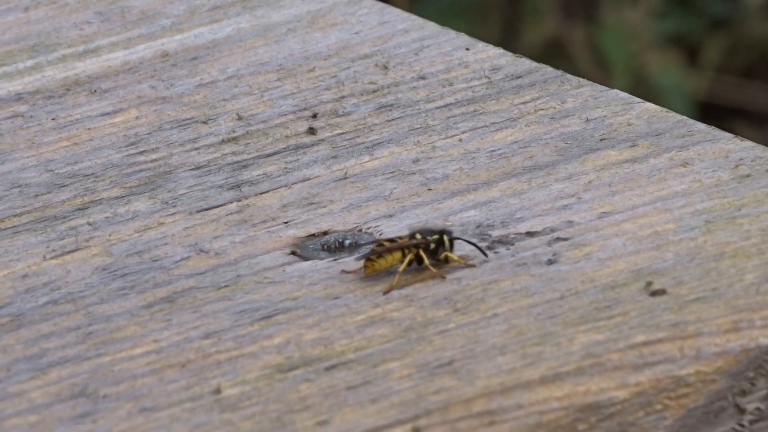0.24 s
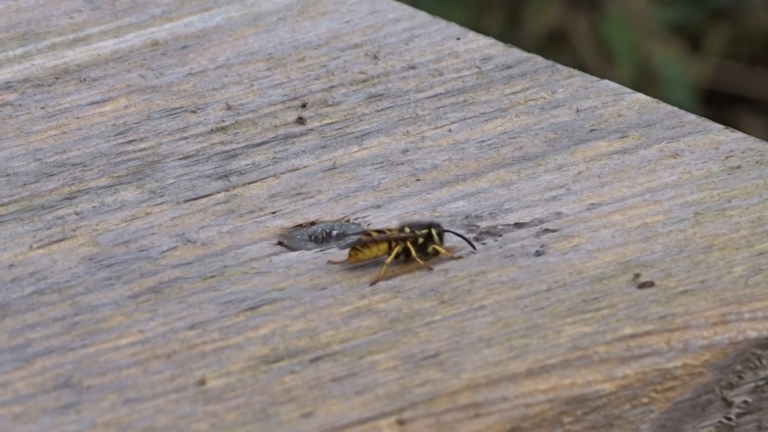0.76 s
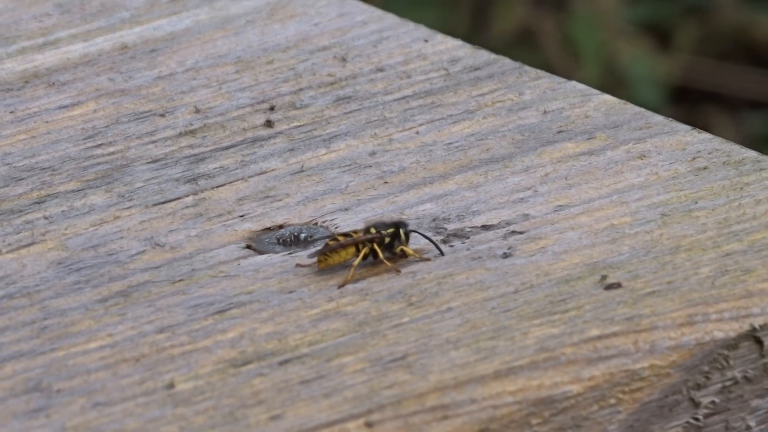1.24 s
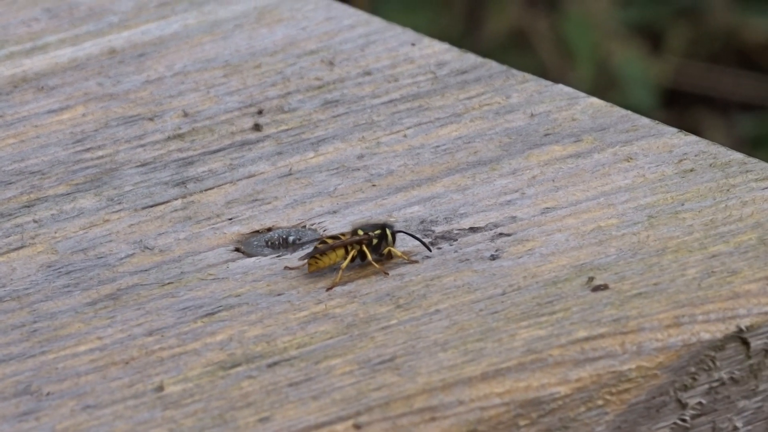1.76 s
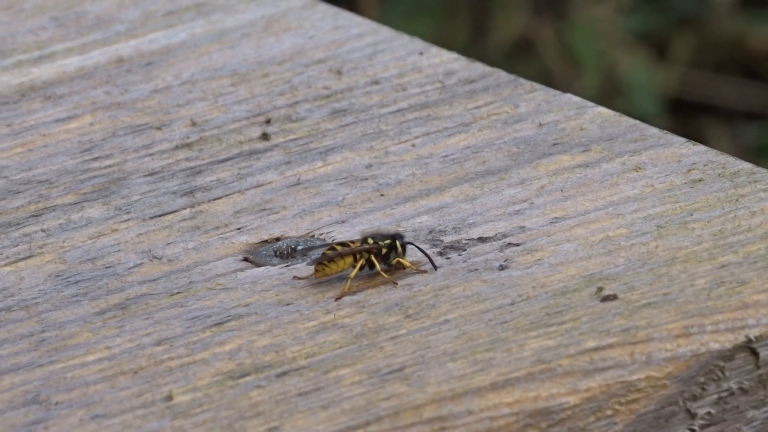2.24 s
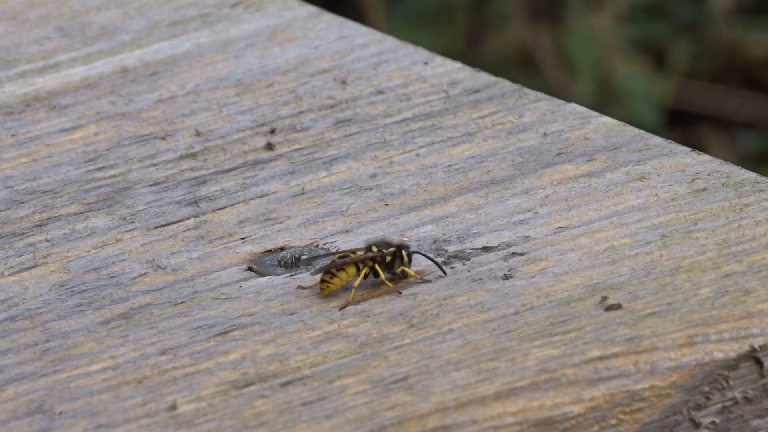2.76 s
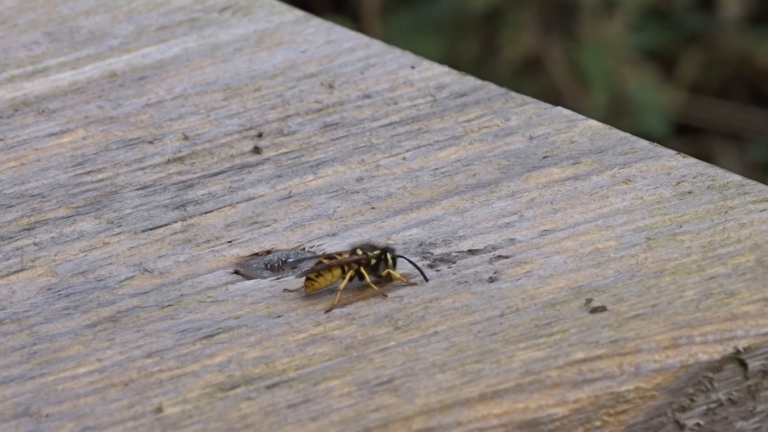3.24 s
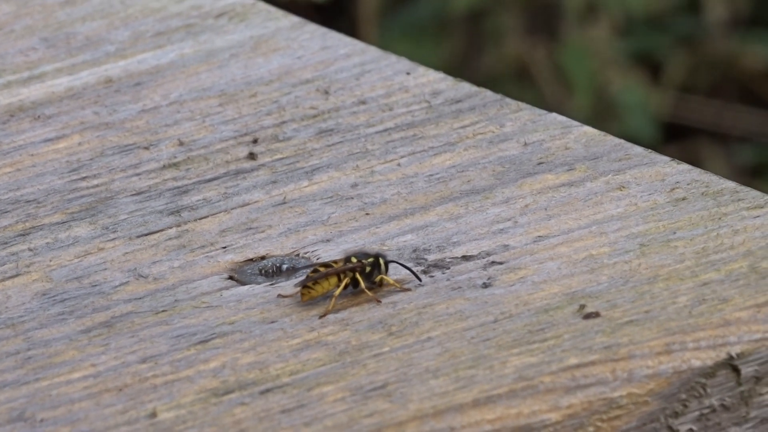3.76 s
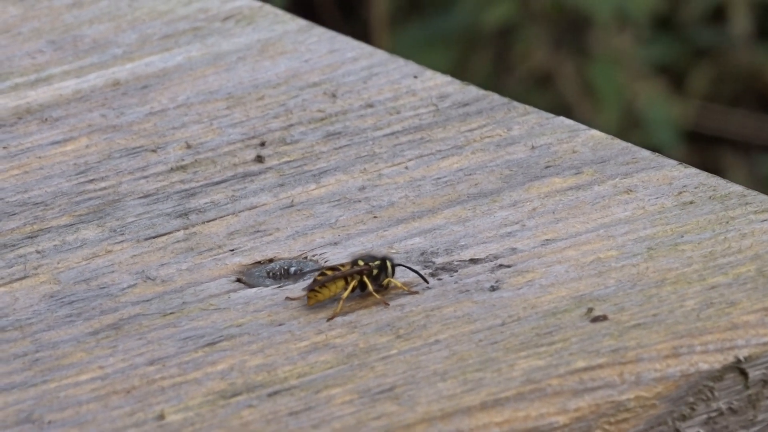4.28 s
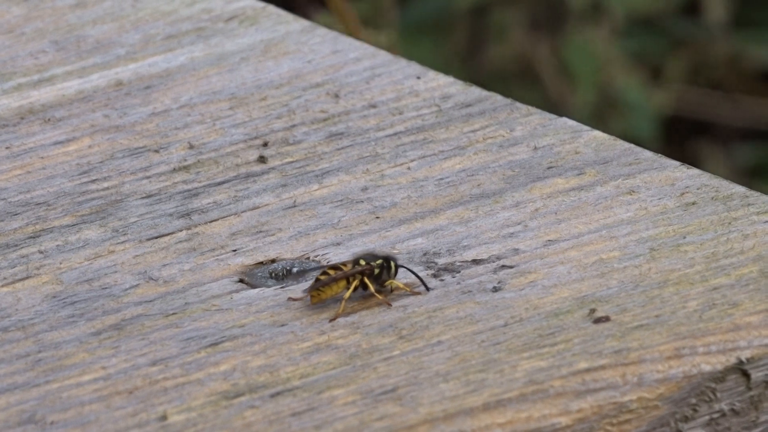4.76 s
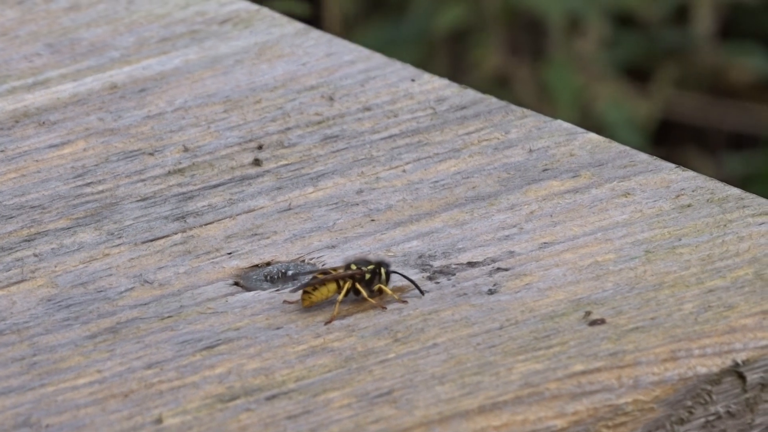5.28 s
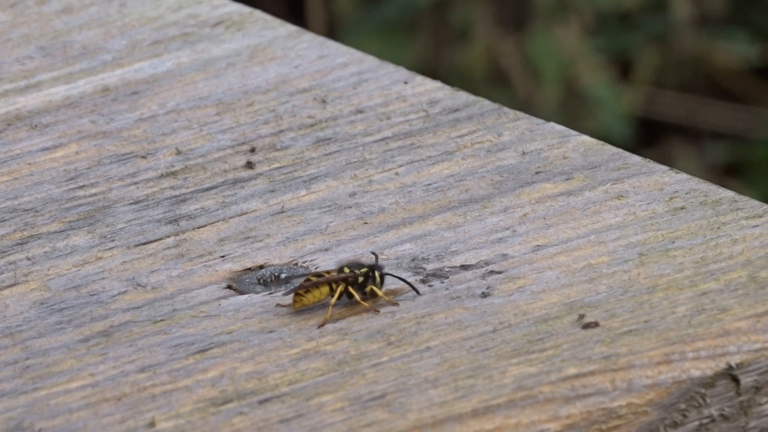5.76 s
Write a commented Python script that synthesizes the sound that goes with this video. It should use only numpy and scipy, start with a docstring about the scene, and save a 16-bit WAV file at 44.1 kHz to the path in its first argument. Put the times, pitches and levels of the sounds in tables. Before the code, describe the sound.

Quiet outdoor garden ambience: distant traffic wash and low engine drone, faint wasp rasping on wood, high cricket buzz, light wind thumps.

```python
"""A wasp rasps fibre off a weathered rail, close to a hand-held camera in a garden: dense tiny clicks.
Bush-crickets buzz very high in the undergrowth, as pulsed noise, and small birds tick far away, as short whistles.
A distant engine drones in a few sine harmonics and slowly speeds up under the filtered-noise wash of a road.
Shrubs stir softly, and light wind buffets the microphone with low flutter and brief pressure dips over faint hiss."""
import sys
import numpy as np
from scipy import signal
from scipy.fft import rfft, irfft, next_fast_len
from scipy.io import wavfile
from scipy.ndimage import uniform_filter1d

SR = 44100
rng = np.random.default_rng(int(sys.argv[2]) if len(sys.argv) > 2 else 0)


def digitize_waveform(pressure):
    """Quantize a signal to 16-bit integers and store it at the path in sys.argv[1].

    Rows of a 2-D input are taken as channels; values are limited to [-1, 1].
    """
    field = np.atleast_2d(pressure).T
    bounded = np.clip(field, -1, 1)
    quanta = np.round(bounded * 32767).astype(np.int16)
    wavfile.write(sys.argv[1], SR, quanta)


N = 265349
TIME = np.arange(N) / SR  # seconds

# Spectrum of tyres on the road. Each row: frequency in Hz, level in dB per Hz.
TYRE_ROAR = [(300, -28.5), (550, -26), (750, -2), (980, 0), (1250, -1), (1600, -11), (2400, -32),
             (4000, -41)]
# Direction of the road. Each row: frequency in Hz, phase by which the left port leads in radians.
ROAD_LEAD = [(0, 0), (300, 0.51), (620, 0.6), (1000, 0.44), (2000, 0), (3500, 0), (6000, 0)]


def undb(db):
    """Decibels to gain."""
    return 10 ** (np.asarray(db) / 20)


def unit(x):
    """Scale to rms 1."""
    return x / np.sqrt(np.mean(x ** 2))


def curves(table):
    """Each column of a time table, joined by straight lines."""
    s, *columns = np.transpose(table)
    return [np.interp(TIME, s, c) for c in columns]


def colour(x, spectrum):
    """Filter by (Hz, dB) points on a log-frequency axis."""
    hz, db = np.transpose(spectrum)
    size = next_fast_len(N)
    bins = np.maximum(np.arange(size // 2 + 1) * SR / size, 1)
    gain = undb(np.interp(np.log(bins), np.log(hz), db))
    return irfft(rfft(x, size) * gain, size)[..., :N]


def noise(spectrum):
    """Coloured noise of rms 1."""
    return unit(colour(rng.standard_normal(N), spectrum))


def walk(rate):
    """Random levels held 1 / rate s and slewed twice; spread near 1."""
    k = int(SR / rate)
    steps = np.repeat(rng.standard_normal(N // k + 1), k)
    return 1.345 * uniform_filter1d(uniform_filter1d(steps, k), k)[:N]


def pan(db):
    """Left and right gains for a left minus right level difference."""
    return undb(np.array([[db], [-db]]) / 2)


def spread(mid, side):
    """Left and right from mid and side."""
    return np.array([mid + side, mid - side])


def wash(spectrum, side_db, flicker_db, rate):
    """Diffuse stereo noise whose level flickers in the moving air."""
    pair = spread(noise(spectrum), undb(side_db) * noise(spectrum))
    return pair * undb(flicker_db * walk(rate))


def swells(events, rest_db=-120):
    """Gain of a resting level with bell-shaped swells (s, dB, half length s) on top; their powers add."""
    power = undb(rest_db) ** 2
    for s, db, half in events:
        power = power + undb(db) ** 2 * np.exp(-((TIME - s) / half) ** 2)
    return np.sqrt(power)


def lead(pair, table):
    """Sound from the left reaches the left port first: turn the phase by (Hz, radians) points."""
    hz, radians = np.transpose(table)
    size = next_fast_len(N)
    turn = np.interp(np.arange(size // 2 + 1) * SR / size, hz, radians)
    return irfft(rfft(pair, size) * np.exp(.5j * np.array([turn, -turn])), size)[:, :N]


def hiss():
    """Smooth, faint microphone hiss, its stereo width varying with frequency."""
    # Hiss spectrum. Each row: frequency in Hz, level in dB per Hz.
    hiss_spectrum = [(1500, -2), (3500, -1), (5200, -6.5), (6200, 0.5), (6700, -2), (7500, 3), (8300, 1.5),
                     (9400, -2), (12000, 0.5), (16000, -0.5)]
    # Width of the hiss. Each row: frequency in Hz, side against mid in dB.
    hiss_width = [(2000, 1), (4000, -5), (5300, -15), (7300, -33), (8600, -6), (9700, -1.5), (12000, -6),
                  (14000, -6), (16000, 4)]
    return undb(-54.5) * spread(noise(hiss_spectrum), colour(noise(hiss_spectrum), hiss_width))


def wind(sharpness=1.3, lag_s=0.0013):
    """A low flutter on the microphone; each stronger eddy is one brief dip in pressure."""
    # Flutter spectrum. Each row: frequency in Hz, level in dB per Hz.
    flutter_spectrum = [(6, -25), (15, 5), (30, -1), (80, 1.5), (130, -13.5), (220, -20), (500, -46.5)]
    # Gusts. Each row: time of the peak in seconds, level in dB, half length in seconds.
    gusts = [(.75, -46.5, 0.087), (4.0, -43, 0.54), (4.68, -39, 0.092), (5.19, -38, 0.077),
             (5.8, -39, 0.08)]
    # Eddies that hit the microphone. Each row: time in seconds, peak in dB, pitch in Hz,
    # left minus right in dB.
    buffets = [(0.473, -34, 79, 7), (0.808, -32, 60, 0), (3.944, -27, 65, 1), (4.537, -24, 108, -1),
               (4.643, -26, 40.3, -11), (4.65, -28, 185, 6.5), (4.714, -20, 76, -2), (4.771, -25.5, 86, 15),
               (4.789, -30.5, 120, 13), (5.107, -24, 70, 0), (5.1259, -17, 136, 3),
               (5.159, -23.5, 133.3, 2), (5.243, -24, 132, 5), (5.265, -25, 126, -2)]
    calm_db = -48.5  # between gusts
    out = swells(gusts, calm_db) * wash(flutter_spectrum, side_db=-15.5, flicker_db=2.0, rate=16)
    for s, db, hz, pan_db in buffets:
        near = np.abs(TIME - s) < .08
        t = TIME[near] - s - np.array([[lag_s], [-lag_s]]) / 2  # the eddy crosses the right port first
        # a smooth dip with a shoulder on each side
        dip = np.real((1 - 1j * sharpness * hz * t) ** -6)
        out[:, near] -= undb(db) * pan(pan_db) * dip
    return out


def cars():
    """Single cars swell and fade with the same tyre roar, shifted so that faster ones sound higher."""
    # Passing cars. Each row: time when nearest in seconds, roar in dB, half length in seconds,
    # centre of the roar in Hz.
    car_passes = [(.08, -45, .22, 940), (.75, -45, 0.42, 1017), (1.4, -43, .15, 1090),
                  (1.56, -50, 0.3, 1700), (1.803, -46, 0.21, 990), (2.65, -48, 0.22, 970),
                  (3.08, -52, 0.29, 1251), (4.3, -59.5, 0.21, 1480), (5.799, -50.5, 0.19, 820)]
    stream_hz = 1013  # centre of the roar of the whole stream
    out = 0
    for s, db, half, hz in car_passes:
        shifted = [(f * hz / stream_hz, d) for f, d in TYRE_ROAR]
        out = out + swells([(s, db, half)]) * wash(shifted, side_db=-15, flicker_db=0.3, rate=12)
    return out


def road():
    """A steady far murmur, a swelling low drone, and nearer tyres that slowly recede; the left port leads."""
    # Spectra of the murmur, the drone and the bright tyre edge. Each row: frequency in Hz, level in dB per Hz.
    murmur_spectrum = [(20, 2), (80, 4.5), (150, 2.5), (230, -0.5), (340, -2.5), (470, -1), (620, 2.5),
                       (800, 1), (1200, -10), (3000, -42)]
    drone_spectrum = [(120, -29), (200, -5), (260, -3), (330, -10.5), (480, -14), (700, -32), (2000, -62)]
    edge_spectrum = [(800, -22), (1300, -0.5), (1650, 1.5), (2300, -5), (3000, -9), (4000, -28.5),
                     (7000, -29)]
    # Heavy traffic swells the drone. Each row: time of the peak in seconds, level in dB, half length in seconds.
    drone_swells = [(.6, -61, .5), (3.55, -55.5, 0.56), (5.7, -52.5, 0.43)]
    drone_rest_db = -63.5
    # start level, then fall in dB per second
    roar_db = -47 - 0.54 * TIME
    edge_db = -52 - 0.82 * TIME
    murmur = undb(-46.5) * wash(murmur_spectrum, side_db=-13.0, flicker_db=0.76, rate=9)
    drone = swells(drone_swells, drone_rest_db) * wash(drone_spectrum, side_db=-10.0, flicker_db=1.0, rate=9)
    roar = undb(roar_db) * wash(TYRE_ROAR, side_db=-9, flicker_db=0.7, rate=12)
    edge = undb(edge_db) * wash(edge_spectrum, side_db=-8, flicker_db=1.15, rate=13)
    # tyre tread sings faintly on one wavering note
    sing_phase = 2 * np.pi * np.cumsum(982 + 5 * walk(25)) / SR
    sing = undb(roar_db - 10.5 + 2.9 * walk(5.92)) * np.sin(sing_phase)
    tyres = (roar + cars() + sing) * pan(-1.8) + edge * pan(-1.4)
    return lead(murmur * pan(-0.12) + drone + tyres, ROAD_LEAD)


def lorry(hz=480, width_hz=150):
    """A far vehicle goes by as one soft, hollow swell of band-limited noise."""
    # The pass: time of the peak in seconds, level in dB, half length in seconds.
    lorry_pass = (4.36, -53.5, 0.24)
    band = [(hz - 2 * width_hz, -30), (hz - width_hz / 2, -3), (hz, 0),
            (hz + width_hz / 2, -3), (hz + 2 * width_hz, -25), (4 * hz, -55)]
    return lead(swells([lorry_pass]) * wash(band, side_db=-7, flicker_db=3.0, rate=8), ROAD_LEAD)


def engine():
    """Only the lowest firing harmonics carry this far; they fade and return as the air moves."""
    # Engine speed. Each row: time in seconds, firing rate in Hz, level of the firing note in dB.
    engine_speed = [(0, 53.62, -41.5), (1.7, 54.6, -38), (3.3, 57.26, -37), (4.55, 60.1, -32),
                    (5.15, 59.87, -40), (6.02, 60.55, -45)]
    # Weaker overtones. Each row: multiple of the firing rate, level against the octave in dB.
    engine_overtones = [(3, -17), (4, -21)]
    # Fades. Each row: time in seconds, half length in seconds, loss of the firing note in dB,
    # loss of its octave in dB.
    engine_fades = [(1.08, .12, 3, -0.5), (1.692, 0.091, -0.5, 10.5), (2.12, 0.18, 13, 9.5),
                    (2.54, 0.13, 8, 1.5), (3.828, 0.049, 5, 0.5), (4.82, 0.099, 3, 4), (5.364, .08, 13, 26),
                    (5.59, 0.18, 6, 11)]
    hz, note_db = curves(engine_speed)
    octave_db = -42.5 - 0.48 * TIME  # nearly steady, falling slowly
    for s, half, note_loss, octave_loss in engine_fades:
        fade = np.exp(-((TIME - s) / half) ** 2)
        note_db = note_db - note_loss * fade
        octave_db = octave_db - octave_loss * fade
    phase = 2 * np.pi * np.cumsum(hz * (1 + 0.0028 * walk(14))) / SR
    out = undb(note_db + 0.49 * walk(13)) * np.sin(phase)
    out = out + undb(octave_db + 0.89 * walk(14)) * np.sin(2 * phase)
    for k, db in engine_overtones:
        out = out + undb(octave_db + db + 1.25 * walk(5.25)) * np.sin(round(k) * phase)
    return np.sqrt(2) * out * pan(0)  # sines to rms level


def leaves():
    """The shrubs behind the rail stir softly: flickering noise that swells."""
    # Leaf spectrum. Each row: frequency in Hz, level in dB per Hz.
    leaf_spectrum = [(2000, -19), (3500, 0), (4500, 2.5), (6200, 0), (7000, 5), (10000, -10), (16000, -28)]
    # Stirs. Each row: time of the peak in seconds, level in dB, half length in seconds.
    stirs = [(3.2, -63, .45), (4.65, -65.5, 0.25)]
    rest_db = -67
    return swells(stirs, rest_db) * wash(leaf_spectrum, side_db=-16, flicker_db=2.5, rate=22)


def birds(rise=0.12, warble=0.032, warble_hz=85):
    """Thin, far contact calls: a short rising whistle with a kink in it."""
    # Calls. Each row: middle of the call in seconds, peak level in dB, pitch in Hz, length in seconds.
    chips = [(0.043, -50.5, 7040, 0.037), (1.19, -55, 7140, 0.039), (1.325, -57, 6750, .02),
             (1.821, -59, 7100, .02), (2.148, -57, 6400, 0.018), (2.299, -60, 4200, 0.028),
             (2.45, -62, 4600, 0.022), (2.572, -56, 6650, 0.023), (2.85, -59, 5470, .03),
             (3.241, -56, 5950, .03), (3.815, -50, 6550, 0.026), (3.97, -60, 4700, .025),
             (4.53, -57.5, 5400, .035), (4.546, -57, 4750, 0.03), (4.573, -56, 4250, .02),
             (4.593, -51.5, 6350, 0.025), (4.612, -55, 7450, .02), (5.232, -54, 7100, .03),
             (5.914, -55, 7100, .036)]
    out = np.zeros(N)
    for s, db, hz, length in chips:
        near = np.abs(TIME - s) < length / 2
        t = TIME[near] - s
        pitch = hz * (1 + rise * t / length - warble * np.sin(2 * np.pi * warble_hz * t))
        whistle = np.sin(2 * np.pi * np.cumsum(pitch) / SR)
        out[near] += undb(db) * np.cos(np.pi * t / length) * whistle
    return out * pan(-.4)


def crickets(stroke_s=.0022, tick_s=.0005, tick_db=7):
    """Each wing stroke starts with a tick and dies away; farther singers blur into a chorus."""
    # Wing spectrum. Each row: frequency in Hz, level in dB per Hz.
    wing_spectrum = [(8000, -34), (11000, -28), (13000, -4.5), (13700, -11), (14700, 1.5), (15600, 3.5),
                     (17000, -10)]
    # Singers. Each row: wing strokes per second, relative level in dB, left minus right in dB.
    singers = [(72.6, 0, .6), (67.9, -3, -.3), (75.3, -5, .3)]
    level_db = -48.5 + 0.21 * TIME + 0.3 * walk(3)  # slowly grows and wavers
    chorus = undb(-1.5)  # steady floor under the strokes
    out = 0
    for rate, db, pan_db in singers:
        strokes = rng.random() + np.cumsum(rate * (1 + 0.0058 * walk(3.8))) / SR
        age = strokes % 1 / rate  # seconds since the stroke began
        force = undb(2 * rng.standard_normal(1024))[strokes.astype(int)]  # one draw per stroke
        scrape = force * (np.exp(-age / stroke_s) + undb(tick_db) * np.exp(-age / tick_s))
        out = out + undb(db) * pan(pan_db) * np.hypot(scrape, chorus) * rng.standard_normal(N)
    return undb(level_db) * unit(colour(out, wing_spectrum))


def wasp(slips_per_s=3500, range_db=14, waver_db=1.3):
    """The jaws catch and snap tiny dry fibres: dense, uneven clicks whose strength wavers irregularly."""
    # Fibre spectrum. Each row: frequency in Hz, level in dB per Hz.
    fibre_spectrum = [(6000, -14), (9000, -13), (10500, -5), (12000, 1), (13200, -5.5), (14200, -1),
                      (16000, -14)]
    # Bouts of harder scraping. Each row: time of the peak in seconds, level in dB, half length in seconds.
    scrape_bouts = [(.35, -58, 0.37), (3.45, -64, .3), (5.05, -55, .65)]
    gnawing_db = -59.7  # steady, under the bouts
    slips = rng.random(N) < slips_per_s / SR
    clicks = slips * rng.choice([-1, 1], N) * undb(-range_db * rng.random(N))
    rasp = unit(colour(clicks, fibre_spectrum)) * undb(waver_db * walk(7.1))
    return swells(scrape_bouts, gnawing_db) * rasp * pan(.3)


def scene():
    """The microphone's own hiss, the garden and the road around the rail, and the wasp on it."""
    distance = road() + lorry() + engine()
    garden = leaves() + birds() + crickets()
    return hiss() + wind() + distance + garden + wasp()


def record(dry):
    """The camera drops the deepest sway and cuts the top steeply."""
    top_hz = 15750
    dry = signal.sosfilt(signal.butter(2, 7, "high", fs=SR, output="sos"), dry)
    return signal.sosfilt(signal.ellip(12, .2, 70, top_hz, fs=SR, output="sos"), dry)


dry = scene()
out = record(dry)
digitize_waveform(out)
```